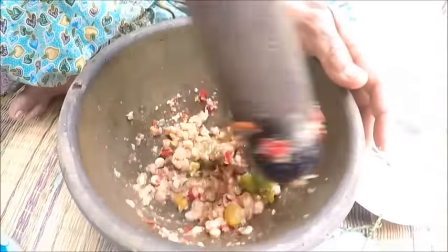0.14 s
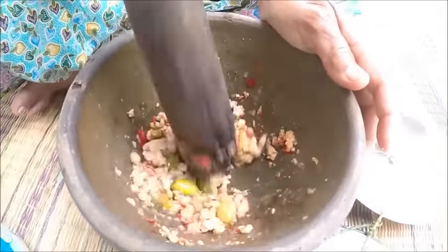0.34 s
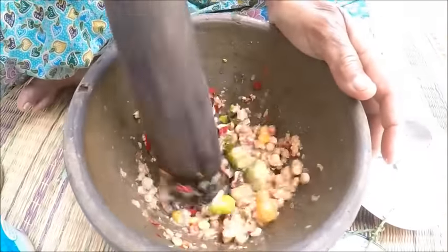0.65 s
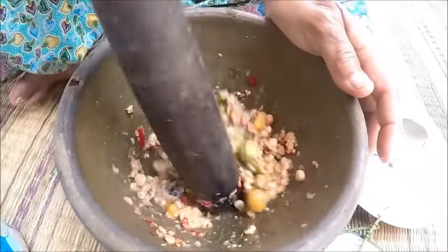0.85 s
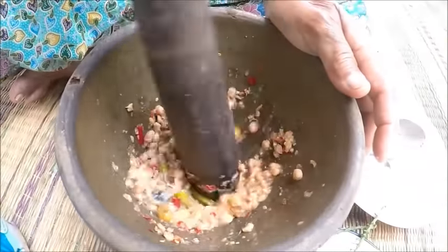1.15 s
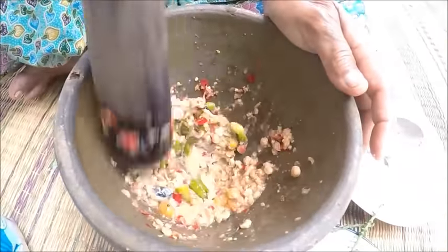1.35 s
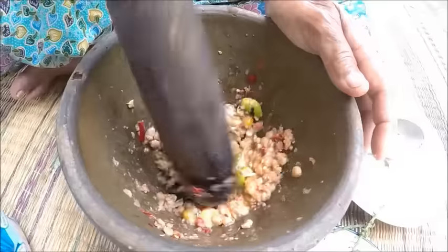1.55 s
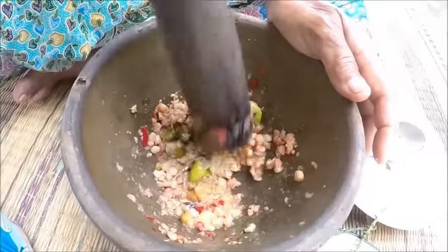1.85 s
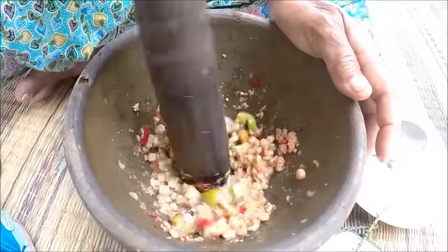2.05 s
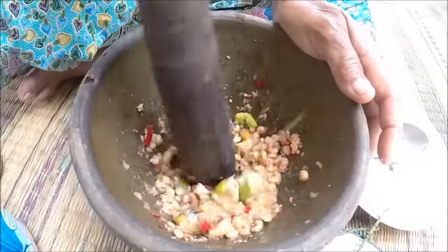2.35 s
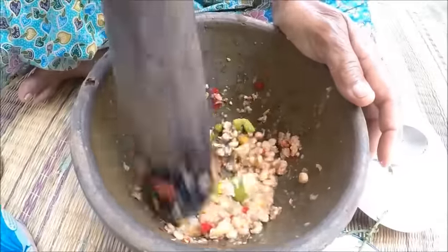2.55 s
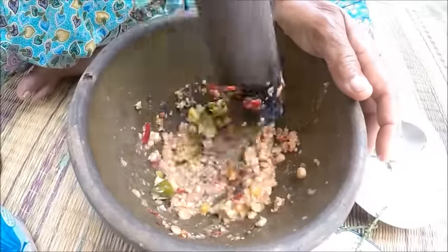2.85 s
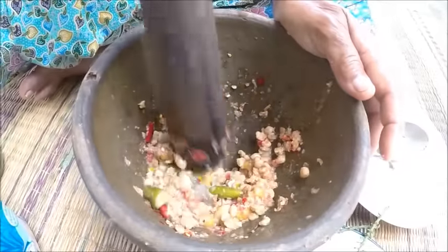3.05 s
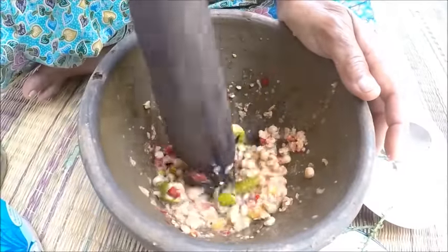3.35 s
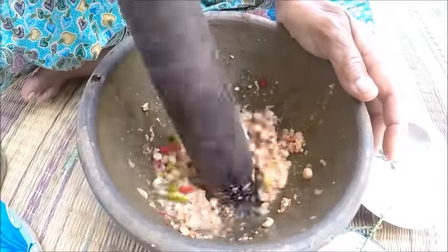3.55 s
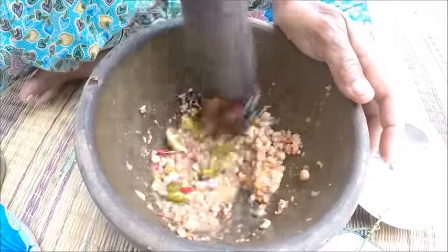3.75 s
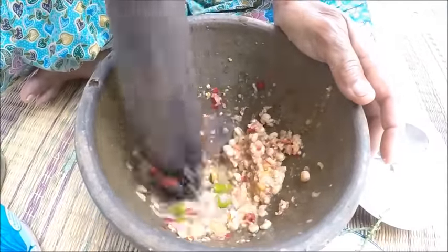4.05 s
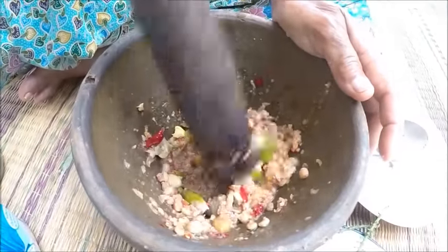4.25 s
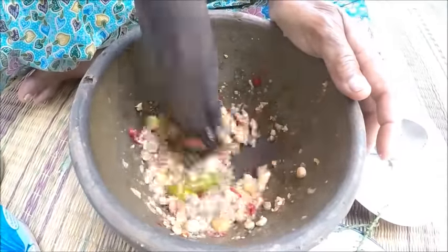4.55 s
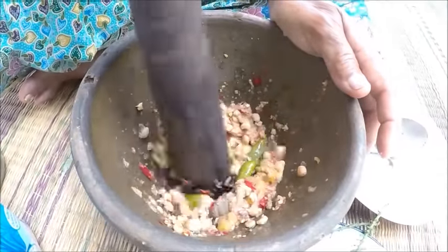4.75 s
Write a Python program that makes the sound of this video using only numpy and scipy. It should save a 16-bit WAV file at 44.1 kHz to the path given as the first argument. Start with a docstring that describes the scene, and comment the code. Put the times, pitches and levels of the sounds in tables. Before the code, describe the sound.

A wooden pestle pounds a moist salad in an earthenware mortar, heard close in a small room. The strokes come evenly, about three a second, from the very start to nearly five seconds. Each one crushes the food with a wet crackle and a hollow squelch, dotted with snapping seeds, tiny bursting droplets and soft plops.

The first strokes are cushioned and fairly soft. At about 0.9 seconds a sharp knock hits the clay, ringing briefly, with a dull thump through the floor. Lighter knocks follow, then stronger hollow ones at 2.1 and 2.3 seconds. Another hard knock at 3.0 seconds comes with a cluster of crisp snaps. After a soft squelch and a lighter hit, loud ringing knocks land at 3.8 and 4.5 seconds, and a last cushioned stroke follows around 4.7. A faint hiss and low drone continue underneath.

```python
"""Ringing knocks and wet squelches: a wooden pestle pounds a salad in an earthenware mortar.
Blows that reach the clay ring it and thump the floor through a mat; cushioned strokes only squelch.
Each stroke crushes the food, which crackles and sounds the hollow of the bowl.
Seeds snap, droplets burst and lumps plop. Behind it, a small room with faint hiss and a low drone."""
import sys
import numpy as np
from scipy import signal
from scipy.fft import rfft, irfft
from scipy.io import wavfile
from scipy.ndimage import uniform_filter1d

SR = 44100
rng = np.random.default_rng(int(sys.argv[2]) if len(sys.argv) > 2 else 0)


def log_audio(samples):
    """Write samples as a 16-bit WAV file to the path given in sys.argv[1]."""
    # one column per channel
    frames = np.atleast_2d(samples).T
    # limit to full scale, then quantise
    limited = np.clip(frames, -1, 1)
    pcm = np.round(limited * 32767).astype(np.int16)
    wavfile.write(sys.argv[1], SR, pcm)


N = 216072
TIME = np.arange(N) / SR

# Pestle on clay; all table levels are relative. (time [s], hollow [dB], rim [dB], rim pitch [Hz],
# rim t60 [s], wall clack [dB], clink [dB], clink pitch [Hz], floor thump [dB], splat [dB])
BLOW_HITS = [ (0.2838, -21, -21.5, 905, 0.075, -57, -29, 3440, -23.5, -30),
             (0.8764, -10.5, -4.5, 892.5, 0.17, -10, -16, 3720, -16.5, -38),
             (1.1794, -42, -18.5, 900, 0.029, -46, -48, 3520, -31, -27),
             (1.4582, -17.5, -15.5, 908, 0.1, -27.5, -28.5, 3640, -30, -28),
             (1.7310, -18.5, -29, 890, .05, -37, -35, 3820, -20, -40),
             (2.0609, -4.5, -12.5, 917, 0.1, -53, -45, 3820, -18, -16.5),
             (2.3326, -8.5, -11.5, 949, 0.12, -28, -24.5, 3790, -26.5, -45.5),
             (2.6695, -27.5, -30.5, 927, 0.25, -39, -68, 3684, -20, -36.5),
             (2.9774, -5.5, -11, 944, 0.13, -12, -33, 3420, -21, -29.5),
             (3.5530, -36, -18.5, 903, 0.038, -33, -23, 3773, -16.5, -33.5),
             (3.8340, -4, -5.5, 909, 0.098, -13.5, -40.5, 3650, -17.5, -35),
             (4.459, -3.5, -8.5, 901, 0.13, -26, -22, 3620, -17, -27.5)]


def knocks(clink_t60_s, rim_rise_s, undamped_db, undamped_extra_s, splat_lead_s, splat_rise_s,
           splat_t60_s):
    """The pestle hits clay: hollow, rim and wall ring, the floor thumps, juice splats just ahead."""
    out, splat_gain = np.zeros(N), np.zeros(N)
    hollow, thump = -hollow_ring(), floor_thump()
    rim_rise = 1 - np.exp(-TIME[:len(hollow)] / rim_rise_s)
    for (s, hollow_db, rim_db, rim_hz, rim_t60_s,
         clack_db, clink_db, clink_hz, thump_db, splat_db) in BLOW_HITS:
        # a faint part of the rim mode escapes the pestle's damping
        undamped = from_db(undamped_db) * ring(rim_hz, rim_t60_s + undamped_extra_s)
        rim = rim_rise * (ring(rim_hz, rim_t60_s) + undamped)
        sound = from_db(hollow_db) * hollow + from_db(thump_db) * thump
        sound += from_db(rim_db) * rim + from_db(clink_db) * ring(clink_hz, clink_t60_s)
        add(out, s, sound + wall_ring(clack_db, clink_db))
        age_s = TIME - (s - splat_lead_s)
        log_envelope = np.minimum(age_s / splat_rise_s, -np.log(1000) * age_s / splat_t60_s)
        splat_gain += from_db(splat_db) * np.exp(log_envelope)
    return out + splat_gain * wet_crackle(per_s=20000, spread_db=3, cycles=8)


# Clay wall modes above the rim mode: (frequency [Hz], level [dB], t60 [s])
WALL_MODES = [(1150, -20.5, .04), (1050, 5, 0.023), (1290, -15, 0.012), (1500, -5.5, 0.026),
              (1460, -6, 0.037), (1550, 3.5, 0.011), (1707, -8.5, 0.058), (1730, -10, 0.078),
              (2116, -11.5, 0.071), (2247, -27.5, 0.14), (2676, -23, 0.026), (3220, -22, 0.28),
              (2940, -8.5, 0.0074), (3280, -14, 0.14), (4750, -15.5, .04), (4960, -35, .04),
              (5345, -19, .03), (5850, -23, 0.036), (6620, -25, 0.17)]


def wall_ring(clack_db, clink_db):
    """The wall rings; strike spot and clinging food shift each mode's level and pitch."""
    out = 0
    for hz, db, t60_s in WALL_MODES:
        drive_db = at_hz([(1700, clack_db), (3600, clink_db)], hz) + rng.normal(0, 3.4)
        loaded_hz = hz * rng.normal(1, .012)
        out += rng.choice([-1, 1]) * from_db(db + drive_db) * ring(loaded_hz, t60_s)
    return out


# Air modes of the bowl: (frequency [Hz], level [dB], t60 [s])
HOLLOW_MODES = [(566, 8, 0.013), (641, 7.5, 0.03), (782, -12.5, 0.032), (1070, -37.5, 0.0079),
                (1087, -22.5, 0.046)]


def hollow_ring():
    """The bowl's air answers a push, the lowest mode in antiphase to the rest."""
    lowest, *higher = [from_db(db) * ring(hz, t60_s) for hz, db, t60_s in HOLLOW_MODES]
    out = sum(higher) - lowest
    return out / np.abs(out).max()


# Mortar on mat and floor: (frequency [Hz], level [dB], t60 [s])
FLOOR_MODES = [(58, -33.5, .2), (111, -14, 0.054), (135, -16, 0.065), (192, -12, 0.024), (293, 1.5, 0.0073)]


def floor_thump():
    """A blow drives low, damped modes under the mortar."""
    return sum(from_db(db) * ring(hz, t60_s) for hz, db, t60_s in FLOOR_MODES)


# Presses into the food; levels at mid-press, swells across it. (time [s], press [s], crackle [dB],
# crackle swell [dB], air delay [s], squelch [dB], squelch swell [dB], lift crackle [dB])
PRESSES = [ (0.000, 0.048, -39, 3, 0, -24.5, 0, -69), (0.277, 0.086, -39.5, -4.5, 0, -31, 3, -50.5),
           (0.567, 0.072, -39, 0, 0.023, -29, -3, -67), (0.884, 0.055, -40, -3, 0.000074, -22, -2.5, -62),
           (1.176, 0.052, -37, -3, 0.03, -20.5, -7, -52), (1.466, 0.07, -39, -6.5, 0.016, -31.5, 13.5, -68),
           (1.747, 0.086, -41.5, 7.5, 0.0059, -27, 4.5, -61),
           (2.068, 0.064, -43.5, -8, 0.016, -31, -10, -56.5), (2.344, 0.075, -44, 16, 0.061, -25.5, 4, -56),
           (2.668, 0.082, -43.5, 5, 0, -30, 6.5, -60), (2.974, 0.066, -39.5, 8, 0, -32, -4.5, -55.5),
           (3.26, .066, -42, -0.5, 0.027, -35.5, 20.5, -56.5),
           (3.553, 0.079, -42.5, -1.5, 0.017, -31.5, 13.5, -56),
           (3.843, 0.076, -41.5, -0.5, 0.019, -32.5, 2, -51.5),
           (4.134, 0.081, -44.5, 1.5, 0.034, -32.5, 3, -55.5),
           (4.469, 0.062, -38.5, -5.5, 0.018, -24, -4, -53), (4.739, 0.1, -44, -4.5, 0.033, -36, -11, -51)]


def crushing(crackle_db, low_db, upper_db, shove_db, stir_db, spray_db):
    """Food gives way: bright crackle, air spurts that sound the hollow, a dull shove on the floor."""
    crackle_gain = crackle_envelope(PRESSES)
    squeeze_gain = squeeze_envelope(PRESSES)
    crackle = food_crackle(crackle_gain)
    spurts = grains(per_s=1100, spread_db=4)
    low = steady(band(resonate(spurts, 637, 81), 604, 935), span_s=.014)
    upper = resonate(spurts, 766, 140) - resonate(spurts, 985, 110) + .5 * resonate(spurts, 1070, 240)
    upper = steady(band(upper, 650, 1500), span_s=.02) * clumps(per_s=90, depth_db=4)
    shove = steady(band(spurts, 70, 190), span_s=.1)
    spray = unit_rms(band(rng.standard_normal(N), 7000, 15500))
    squelch = from_db(low_db) * low + from_db(upper_db) * upper
    squelch += from_db(shove_db) * shove + from_db(spray_db) * spray
    stirred_air = from_db(stir_db) * crackle_gain * (low + upper)
    return from_db(crackle_db) * crackle + squeeze_gain * squelch + stirred_air


def crackle_envelope(presses):
    """Crackle holds through a press, fades as the mash settles, returns as the wet tip peels off."""
    attack_s, release_s, edge_drop_db = .002, .0099, 2.5
    settle_db, settle_s = -8.5, .025
    lift_delay_s, lift_rise_s, lift_fall_s = .057, .03, .048
    gain, fits = np.zeros(N), clumps(per_s=120, depth_db=4)
    for s, press_s, crackle_db, swell_db, _, _, _, lift_db in presses:
        age_s = np.maximum(TIME - s, 0)
        rest_s = np.maximum(age_s - press_s, 0)
        from_middle = np.minimum(age_s / press_s, 1) - .5
        hold = from_db(crackle_db + swell_db * from_middle - edge_drop_db * (2 * from_middle) ** 2)
        settling = from_db(settle_db) * fits * np.exp(-rest_s / settle_s)
        release = np.maximum(np.exp(-rest_s / release_s), settling)
        from_lift_s = age_s - press_s - lift_delay_s
        lift_width_s = np.where(from_lift_s < 0, lift_rise_s, lift_fall_s)
        lift = from_db(lift_db) * np.exp(-.5 * (from_lift_s / lift_width_s) ** 2)
        gain += (1 - np.exp(-age_s / attack_s)) * np.hypot(hold * release, fits * lift)
    return gain


def squeeze_envelope(presses, rise_s=.0013, release_s=.0015):
    """Air escapes in fits while the pestle sinks and stops when it rests."""
    gain = np.zeros(N)
    for s, press_s, _, _, delay_s, squelch_db, swell_db, _ in presses:
        age_s = TIME - s
        log_gate = np.minimum((age_s - delay_s) / rise_s, (press_s - age_s) / release_s)
        from_middle = np.clip(age_s / press_s, 0, 1) - .5
        gain += from_db(squelch_db + swell_db * from_middle) * np.exp(np.clip(log_gate, -20, 0))
    return gain * clumps(per_s=110, depth_db=3.5)


def food_crackle(gain):
    """Bursts crowd together under pressure and thin to duller ticks as the pestle lifts."""
    crush = wet_crackle(per_s=3600, spread_db=4, cycles=14) * clumps(per_s=300, depth_db=3.3)
    ticks = band(wet_crackle(per_s=1200, spread_db=4.5, cycles=12), 900, 9000, order=1)
    pressure = gain / (gain + from_db(-51))
    return gain * (np.sqrt(pressure) * crush + from_db(-3) * np.sqrt(1 - pressure) * ticks)


# Wet crackle spectrum: (frequency [Hz], level [dB])
CRACKLE_SPECTRUM = [(1100, 4), (1650, 1.5), (2000, -4), (2500, -11), (3100, 5), (3600, 6), (4200, -2),
                    (5200, -5.5), (6500, -6.5), (8000, -23.5), (10000, -20.5), (13000, -16), (16000, -28.5)]


def wet_crackle(per_s, spread_db, cycles, bands=24):
    """Cells and juice films burst and ring briefly; high ones exceed the base rate and merge to fizz."""
    out = np.zeros(N)
    for hz in np.geomspace(1150, 15000, bands):
        band_per_s = per_s / bands * (1 + (hz / 6000) ** 3)
        swarm = wander(per_s=70, depth_db=3)  # bubbles of one size come in swarms
        pops = resonate(swarm * grains(band_per_s, spread_db), hz, hz / cycles)
        out += unit_rms(resonate(pops, hz, hz / 2)) * from_db(at_hz(CRACKLE_SPECTRUM, hz)) * np.sqrt(hz)
    return steady(out, span_s=.03)


# Snapping seeds and skins: (time [s], level [dB], pitch [Hz])
SEED_SNAPS = [(0.1306, -28.5, 2530), (0.3053, -13, 3400), (0.3991, -21, 4200), (0.4577, -21, 3900),
              (0.4794, -29.5, 1900), (0.5738, -16.5, 4550), (0.5950, -8.5, 3370), (0.9183, -8, 4660),
              (1.2030, -15, 4510), (1.4950, -13.5, 3950), (1.8125, -8, 3150), (2.4085, -12, 4400),
              (2.7372, -18, 5490), (2.8838, -30.5, 3420), (2.9901, -5, 3330), (3.0051, -3.5, 3340),
              (3.0168, -8, 3550), (3.0920, -25, 3630), (3.2400, -21.5, 5500), (3.8643, -11, 3440),
              (3.8880, -9.5, 3140), (3.9536, -26.5, 2580), (4.1640, -18, 3250), (4.2823, -29.5, 3610),
              (4.5742, -12, 3310)]
# Bursting juice droplets: (time [s], level [dB], pitch [Hz])
JUICE_DROPLETS = [(0.4795, -36, 8000), (0.9735, -24, 11500), (1.4560, -26, 12500), (2.0590, -22, 11000),
                  (2.4610, -39, 12000)]


def bursts(events, t60_s, relative_width, broad_db, crack):
    """A seed, skin or droplet bursts: a crack and brief tearing, coloured around its pitch."""
    out, t = np.zeros(N), TIME[:SR // 20]
    for s, db, hz in events:
        tear = rng.standard_normal(len(t)) * decay(t, t60_s)
        tear[0] += crack
        sound = resonate(tear, hz, hz * relative_width)
        sound += from_db(broad_db) * band(tear, hz / 2, hz * 1.4)
        sound = band(sound, hz / 4, hz * 2.2)
        add(out, s, from_db(db) * sound / np.abs(sound).max())
    return out


# Soft lumps and air pockets, plus light second contacts of the pestle around 1.76-1.78 s: (time [s], level
# [dB], pitch [Hz])
SOFT_PLOPS = [(0.131, -31.5, 507), (0.209, -37.5, 480), (0.222, -41, 468), (0.234, -36.5, 464),
              (0.4808, -13.5, 650), (0.4935, -23.5, 470), (0.5950, -29.5, 680), (1.2030, -22.5, 596),
              (1.756, -21, 647), (1.7700, -24.5, 484), (1.7825, -17, 583), (2.4070, -19, 775),
              (2.8070, -34.5, 860), (3.9150, -14.5, 740)]


def plops(t60_s, hollow_db):
    """A soft lump or light pestle contact gives a short low note and stirs the hollow."""
    out, hollow = np.zeros(N), from_db(hollow_db) * hollow_ring()
    for s, db, hz in SOFT_PLOPS:
        add(out, s, from_db(db) * (ring(hz, t60_s) - hollow))
    return band(out, 281.4, 2500)


def room(x, t60_s, first_wall_s):
    """A diffuse tail follows the first wall reflection."""
    t = TIME[:SR * 3 // 4]
    noise = rng.standard_normal(len(t))
    tail = (band(noise, 87, 1700) + band(noise, 1200, 9000)) * decay(t, t60_s) * (t > first_wall_s)
    return signal.fftconvolve(x, tail / np.sqrt(np.sum(tail ** 2)))[:N]


# Room noise spectrum: (frequency [Hz], density [dB])
HISS_SPECTRUM = [(12, -45), (20, 5), (61, 5.5), (210, -12.5), (410, -18.5), (660, -18), (738, -18),
                 (923, -19.5), (1150, -23), (1910, -30), (2390, -26.5), (3340, -26.5), (8890, -36.5),
                 (14300, -39), (16000, -57.5)]


def background(hiss_db, drone_hz, drone_width_hz, drone_db):
    """Faint hiss with a low, wavering drone."""
    hz = np.maximum(np.fft.rfftfreq(N, 1 / SR), 1)
    hiss = irfft(rfft(rng.standard_normal(N)) * from_db(at_hz(HISS_SPECTRUM, hz)), N)
    drone = resonate(rng.standard_normal(N + SR), drone_hz, drone_width_hz)
    drone = resonate(drone, drone_hz, drone_width_hz)[SR:]
    return from_db(hiss_db) * unit_rms(hiss) + from_db(drone_db) * unit_rms(drone)


def grains(per_s, spread_db):
    """Random clicks of uneven size and either sign."""
    at = np.flatnonzero(rng.random(N) < per_s / SR)
    sizes = from_db(spread_db * np.minimum(rng.exponential(1, len(at)), 4))
    clicks = np.zeros(N)
    clicks[at] = sizes * rng.choice([-1, 1], len(at))
    return clicks


def clumps(per_s, depth_db):
    """Food yields in fits: a fast random gain near unit power."""
    return steady(wander(per_s, depth_db), span_s=.04)


def wander(per_s, depth_db):
    """A gain gliding between random values."""
    knots = rng.standard_normal(int(per_s * N / SR) + 2)
    return np.interp(TIME * per_s, np.arange(len(knots)), from_db(depth_db * knots))


def steady(x, span_s):
    """Evens out the level, leaving the fine grain."""
    power = uniform_filter1d(x ** 2, int(span_s * SR))
    return x / np.sqrt(np.maximum(power, 0) + np.mean(x ** 2) / 100)


def resonate(x, hz, width_hz):
    """Two-pole resonance, unit peak gain."""
    r = np.exp(-np.pi * width_hz / SR)
    feedback = [1, -2 * r * np.cos(2 * np.pi * hz / SR), r * r]
    return signal.lfilter(np.array([1, 0, -1]) * (1 - r * r) / 2, feedback, x + 1e-18)


def ring(hz, t60_s):
    t = TIME[:SR // 2]
    return np.sin(2 * np.pi * hz * t) * decay(t, t60_s)


def decay(t, t60_s):
    return np.exp(-np.log(1000) * t / t60_s)


def band(x, low_hz, high_hz, order=2):
    sos = signal.butter(order, [low_hz, min(high_hz, .45 * SR)], "band", fs=SR, output="sos")
    return signal.sosfilt(sos, x)


def at_hz(points, hz):
    """Spectrum level, interpolated over log frequency."""
    points_hz, points_db = np.array(points).T
    return np.interp(np.log(hz), np.log(points_hz), points_db)


def add(track, s, sound):
    start = round(s * SR)
    track[start:start + len(sound)] += sound[:N - start]


def from_db(db):
    return 10 ** (np.asarray(db) / 20)


def unit_rms(x):
    return x / np.sqrt(np.mean(x ** 2) + 1e-20)


def scene():
    """The mortar close by in a small room, mono."""
    mortar = knocks(clink_t60_s=.057, rim_rise_s=.00092, undamped_db=-27.5, undamped_extra_s=.36,
                    splat_lead_s=.00027, splat_rise_s=.0015, splat_t60_s=.022)
    mortar += crushing(crackle_db=5.5, low_db=-3, upper_db=-16.5, shove_db=-19, stir_db=-1,
                       spray_db=-35.5)
    mortar += from_db(-7.5) * bursts(SEED_SNAPS, t60_s=.035, relative_width=.11, broad_db=-14, crack=5.9)
    mortar += from_db(-3) * bursts(JUICE_DROPLETS, t60_s=.011, relative_width=.13, broad_db=-12,
                                   crack=.91)
    mortar += plops(t60_s=.018, hollow_db=-6)
    reverb = from_db(-20) * room(mortar, t60_s=.29, first_wall_s=.008)
    ambience = background(hiss_db=-50.5, drone_hz=53.1, drone_width_hz=6.8, drone_db=-50.5)
    return (mortar + reverb + ambience)[None]


def record(dry, ceiling=.98, cutoff_hz=15700):
    """Soft clip, then a steep low-pass."""
    rounded = dry / (1 + (dry / ceiling) ** 8) ** (1 / 8)
    return signal.sosfilt(signal.ellip(10, .2, 80, cutoff_hz, fs=SR, output="sos"), rounded)


dry = scene()
out = record(dry)
log_audio(out)
```